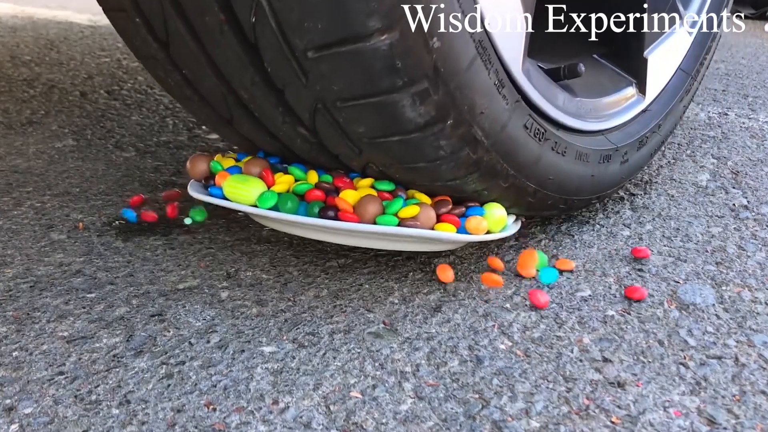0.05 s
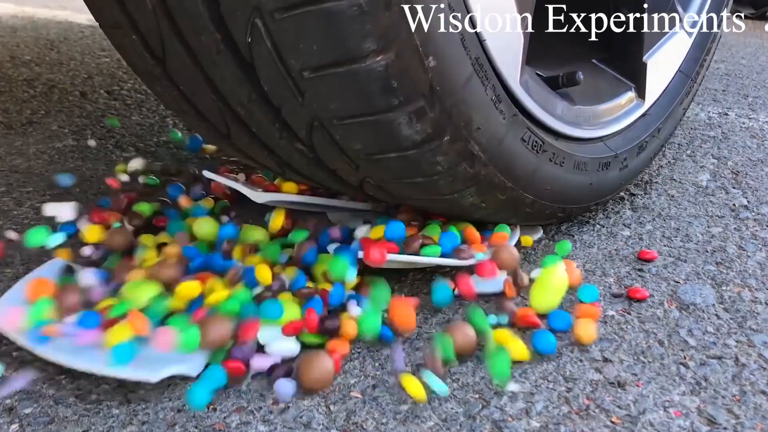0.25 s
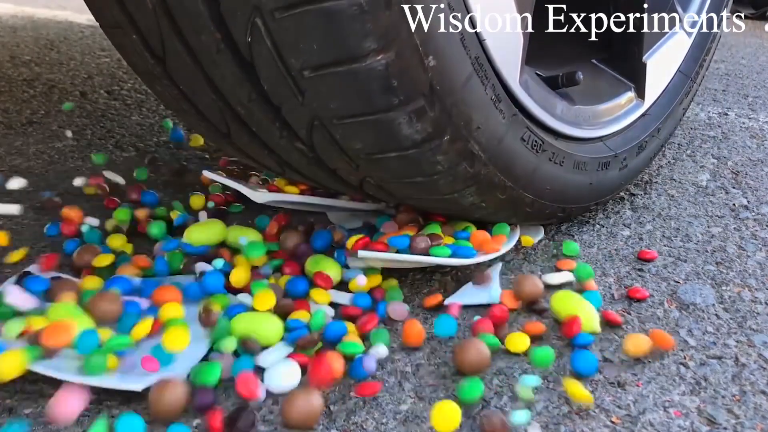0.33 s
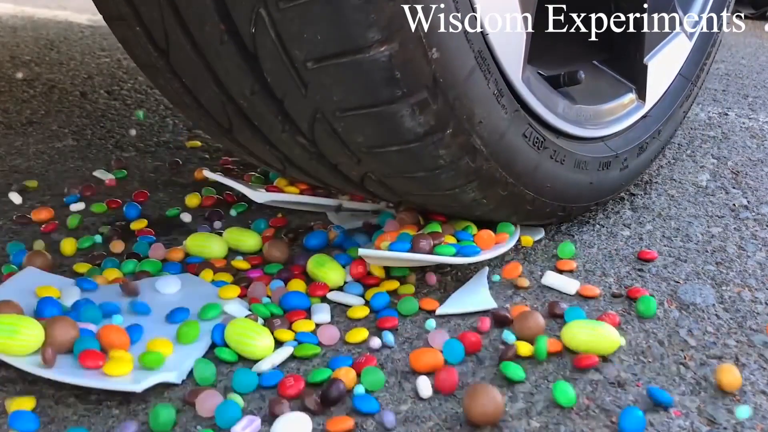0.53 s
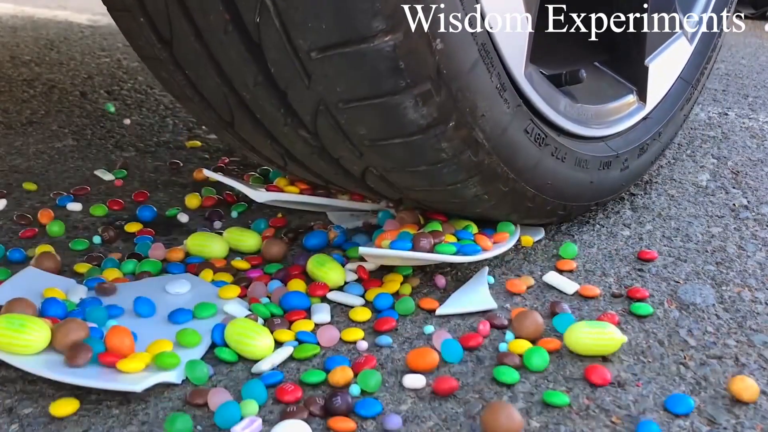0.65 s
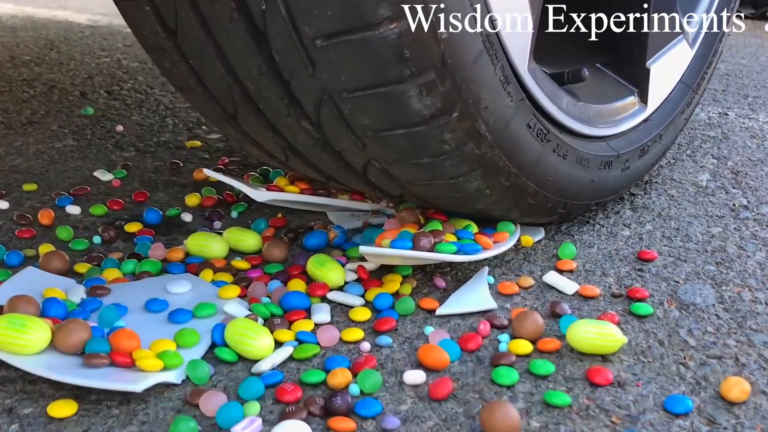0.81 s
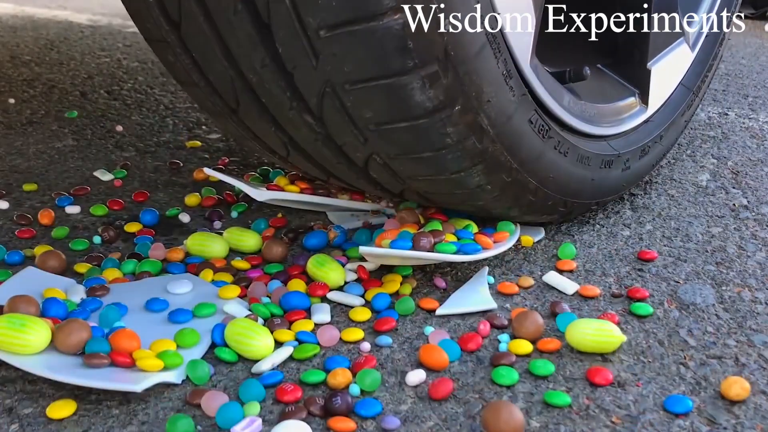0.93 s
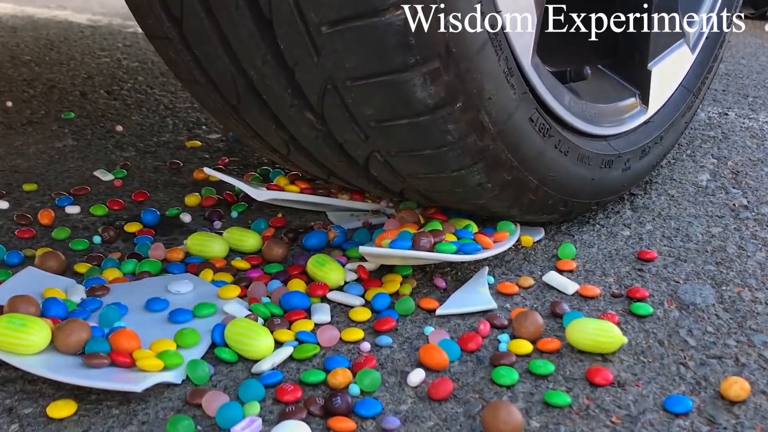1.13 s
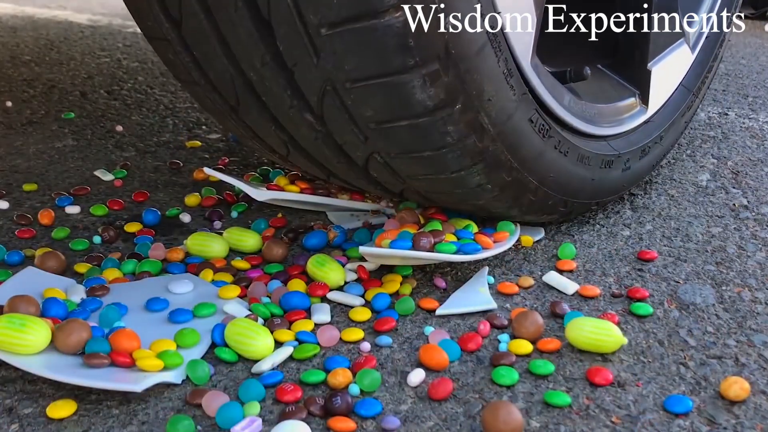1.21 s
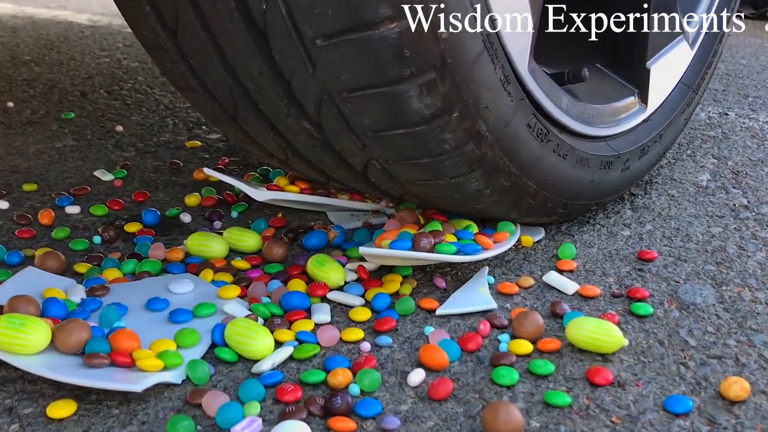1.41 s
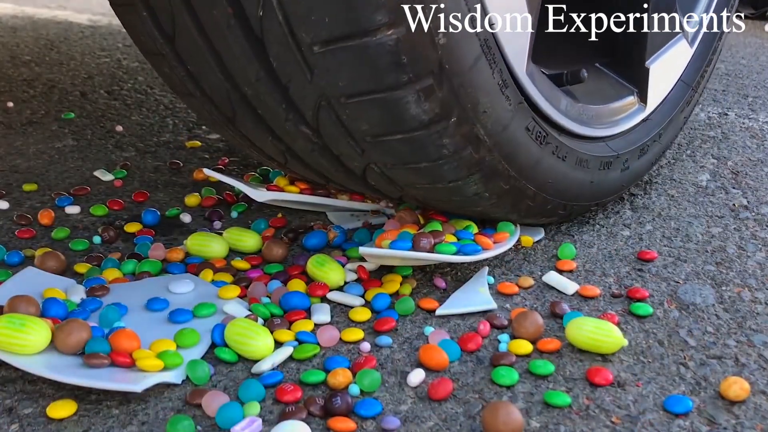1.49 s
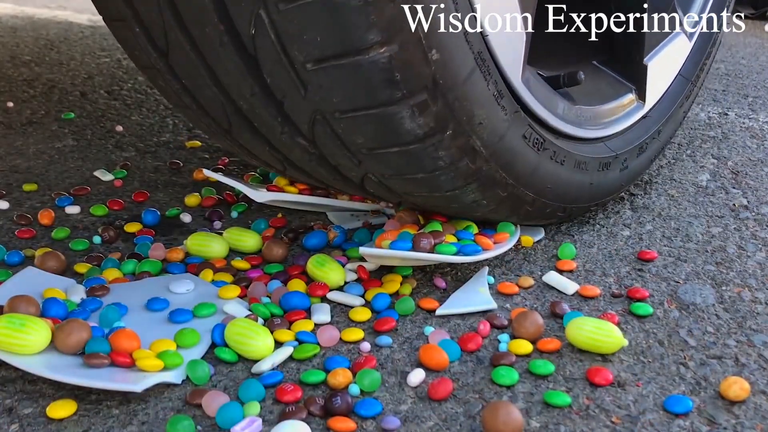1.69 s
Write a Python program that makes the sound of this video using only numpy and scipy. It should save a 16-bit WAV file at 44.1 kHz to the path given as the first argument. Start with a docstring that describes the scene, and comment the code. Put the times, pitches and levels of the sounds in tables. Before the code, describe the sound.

A plate cracks loudly beneath a tyre, then fragments and sweets clatter across asphalt.

```python
"""Sugar shells crackle as a car tyre rolls onto a china plate of sweets on asphalt. The plate snaps in a
brittle fracture, and a large shard skids away, its bending modes struck anew at every contact, while sweets
and fragments scatter and click. The tyre crunches on over the crumbs. Turbulent wind buffets the close
microphone throughout, and the break overloads it."""
import sys
import numpy as np
from scipy import signal
from scipy.fft import rfft, irfft, next_fast_len
from scipy.io import wavfile
from scipy.ndimage import map_coordinates

SR = 44100
rng = np.random.default_rng(int(sys.argv[2]) if len(sys.argv) > 2 else 0)


def digitize_waveform(pressure):
    """Quantize a signal to 16-bit integers and store it at the path in sys.argv[1].

    Rows of a 2-D input are taken as channels; values are limited to [-1, 1].
    """
    field = np.atleast_2d(pressure).T
    bounded = np.clip(field, -1, 1)
    quanta = np.round(bounded * 32767).astype(np.int16)
    wavfile.write(sys.argv[1], SR, quanta)


N = 77175
TIME_S = np.arange(N) / SR


def amp(db):
    """Decibels to amplitude ratio."""
    return 10 ** (np.asarray(db) / 20)


def unit(x):
    """Normalisation to rms 1."""
    return x / np.sqrt(np.mean(x ** 2) + 1e-20)


def curve(rows):
    """Linear interpolation of (time_s, value) points, one value per sample."""
    return np.interp(TIME_S, *np.transpose(rows))


def filtered(x, response):
    """Zero-phase filtering: the spectrum of x times a function of frequency."""
    size = next_fast_len(N + 8192)
    return irfft(rfft(x, size) * response(np.fft.rfftfreq(size, 1 / SR)), size)[:N]


def noise(colour):
    """Gaussian noise of rms 1, spectrally shaped by (frequency_hz, level_db) points."""
    points_hz, db = np.transpose(colour)
    white = rng.standard_normal(N)
    return unit(filtered(white, lambda hz: amp(np.interp(np.log(hz + 1), np.log(points_hz), db))))


def decay(t60_s):
    """Exponential decay by 60 dB in t60_s."""
    return np.exp(-np.log(1000) * TIME_S / t60_s)


def sine(hz):
    """Simple harmonic motion with random phase."""
    return np.sin(2 * np.pi * (hz * TIME_S + rng.random()))


def wobble(knots_per_s):
    """Smooth random modulation: a spline through Gaussian knots."""
    knots = rng.standard_normal(int(N * knots_per_s / SR) + 4)
    return map_coordinates(knots, [TIME_S * knots_per_s])


def add(out, start_s, x):
    """Superposition of x on out from start_s on."""
    i = round(start_s * SR)
    out[i:] += x[:N - i]


def bursts(rows, width_oct):
    """Damped transients: band noise whose amplitude halves width_oct either side of its centre."""
    out = np.zeros(N)
    for start_s, db, centre_hz, t60_s in rows:
        white = rng.standard_normal(N)
        band = filtered(white, lambda hz: 1 / (1 + (np.log2((hz + 1) / centre_hz) / width_oct) ** 2))
        add(out, start_s, amp(db) * decay(t60_s) * unit(band))
    return out


def grains(per_s, centre_hz, spread_oct, decay_cycles, scatter_db, samples):
    """Shot noise of rms 1: randomly timed damped sines, each falling to 1/e in decay_cycles."""
    t = np.arange(samples) / SR
    when, pitch, strength = np.hsplit(rng.random((int(per_s * N / SR), 3)), 3)
    hz = centre_hz * 2 ** (spread_oct * (2 * pitch - 1))
    gain = amp(scatter_db * np.minimum(-np.log(strength), 5))
    rings = gain * np.sin(2 * np.pi * hz * t) * np.exp(-t * hz / decay_cycles)
    index = (when * N).astype(int) + np.arange(samples)
    return unit(np.bincount(index.ravel(), rings.ravel(), N)[:N])


def shell_cracks():
    """Brittle fracture: sugar shells under the tyre release their strain in short dry ticks."""
    # start_s, level_db, centre_hz, t60_s
    cracks = [(.0008, -11.5, 5800, 0.011), (.02, -6, 8000, 0.01), (.0275, -26, 8000, 0.013),
              (.0325, -13.5, 9100, 0.0071), (.05, -13.5, 7300, 0.0088), (.072, -15.5, 13200, 0.021),
              (.086, -21, 4030, 0.021), (.114, -13.5, 8450, 0.0068), (.1325, -20.5, 11300, 0.022),
              (.141, -10.5, 11300, 0.0043), (0.1744, -13.5, 3240, 0.011), (0.2015, -8.5, 5100, 0.0054),
              (.205, -11.5, 9100, 0.012), (0.222, -18, 8000, 0.023), (.871, -22, 13000, 0.0051),
              (.9283, -14.5, 12100, 0.0018), (1.113, -18.5, 13000, 0.007), (1.2515, -23.5, 11600, 0.0089),
              (1.293, -25.5, 11200, 0.0075), (1.3815, -16.5, 6400, 0.016), (1.3942, -23, 7950, .014),
              (1.4212, -22.5, 5340, 0.0083)]
    return bursts(cracks, width_oct=1.55)


def sweet_rattle():
    """Heavily damped impacts: rolling and crushed sweets make tiny clicks that merge into a rattle."""
    # time_s, level_db
    levels = [(0, -24.5), (.04, -34.5), (.11, -37.5), (.165, -38), (.23, -29), (.26, -10), (.33, -38),
              (.42, -42), (.48, -32.5), (.62, -38.5), (.74, -37.5), (.9, -43), (1.0, -38), (1.12, -45),
              (1.3, -45.5), (1.5, -59), (1.75, -48)]
    clicks = grains(per_s=2200, centre_hz=8270, spread_oct=1.03, decay_cycles=3.4,
                    scatter_db=3, samples=256)
    return amp(curve(levels)) * clicks


def wind():
    """Turbulent pressure on the microphone rumbles; stronger gusts reach higher in frequency."""
    # gust strength: time_s, level_db
    gusts = [(0, -32.5), (.06, -40.5), (.122, -47), (.136, -25.5), (.165, -42), (.22, -29.5), (.265, -21),
             (.33, -30.5), (.42, -41.5), (.51, -36.5), (.65, -47.5), (.9, -42.5), (.97, -38), (1.07, -42.5),
             (1.13, -38), (1.15, -25.5), (1.21, -23), (1.26, -26), (1.32, -28), (1.38, -37), (1.44, -34),
             (1.485, -27.5), (1.53, -24.5), (1.555, -31), (1.571, -22.5), (1.59, -35.5), (1.66, -28),
             (1.75, -28)]
    # spectrum of the rumble: frequency_hz, level_db
    low_colour = [(20, -15), (65, 1), (170, -2), (300, -8), (700, -28), (2000, -63), (8000, -90)]
    # spectrum that strong gusts bring out: frequency_hz, level_db
    high_colour = [(40, -62), (170, 4.5), (400, -4.5), (650, -5), (1100, -22.5), (3000, -26), (10000, -82)]
    gust_db, strong_db = curve(gusts), -22
    high_db = -27.5 + 1.76 * (gust_db - strong_db)
    return amp(gust_db - 1) * noise(low_colour) + amp(high_db) * noise(high_colour)


def outdoor_hiss():
    """Broadband ambient noise, whose level dips after the break and recovers."""
    # frequency_hz, level_db
    colour = [(180, -28), (300, -6.5), (500, 1), (744, -2.5), (1280, -3.5), (1440, -4.5), (2280, -4.5),
              (10800, -19.5), (11900, -10.5), (15500, -13)]
    # time_s, level_db
    levels = [(0, -35.5), (.24, -37), (.45, -70), (.7, -52), (.9, -44), (1.15, -39.5), (1.4, -38),
              (1.75, -38)]
    return amp(curve(levels)) * noise(colour)


def plate_knocks():
    """Damped resonance: the strained plate knocks on the asphalt in a narrow band."""
    # start_s, level_db, centre_hz, t60_s
    knocks = [(.086, -22, 840, 0.025), (.1744, -19, 900, 0.021), (.2012, -24, 950, 0.036),
              (.2445, -4, 943, .022), (.247, -10.5, 440, 0.017)]
    return bursts(knocks, width_oct=0.32)


def wind_puffs():
    """Bipolar pressure pulses: each sharp buffet pushes and then pulls the diaphragm."""
    # centre_s, peak_db, half_width_s
    puffs = [(.134, -21.5, 0.00063), (1.174, -15.5, .0005), (1.242, -14.5, 0.00072), (1.257, -15, 0.0011),
             (1.486, -17, 0.00062), (1.57, -15, 0.00048)]
    out = np.zeros(N)
    for centre_s, peak_db, half_width_s in puffs:
        u = (TIME_S - centre_s) / half_width_s
        out -= amp(peak_db) * u * np.exp((1 - u ** 2) / 2)
    return out


def plate_fracture():
    """Sudden release of strain: the plate snaps in broad bursts and its freed halves flex in low modes."""
    # start_s, level_db, t60_s
    snaps = [(0.2442, 2, 0.041), (0.2474, -11.5, 0.22)]
    # spectrum of a snap: frequency_hz, level_db
    colour = [(40, 7), (200, 14.5), (500, -1), (1000, 5), (1400, 3), (2700, 0), (5000, 0.5), (6500, -11.5),
              (10000, -5), (16000, -16)]
    # pitch_hz, level_db, t60_s
    bending_modes = [(211.7, -6.5, 0.42), (602, -27.5, 0.44)]
    bend_start_s, attack_s = 0.255, 0.017
    attack = 1 - np.exp(-TIME_S / attack_s)
    out = np.zeros(N)
    for start_s, db, t60_s in snaps:
        add(out, start_s, amp(db) * decay(t60_s) * noise(colour))
    for hz, db, t60_s in bending_modes:
        add(out, bend_start_s, amp(db) * decay(t60_s) * attack * sine(hz))
    return out


def china_fragments():
    """Lighter damping lets tumbling bits of china ring longer than the sweets."""
    # time_s, level_db
    levels = [(.24, -54), (.25, -23), (.285, -13), (.31, -27.5), (.37, -19.5), (.42, -27.5), (.455, -36),
              (.55, -40), (.66, -42.5), (.74, -62)]
    rings = grains(per_s=1100, centre_hz=4895, spread_oct=1.3, decay_cycles=24,
                   scatter_db=2, samples=1024)
    return amp(curve(levels)) * rings


def clinks():
    """Free vibration: loose sweets and chips land and ring briefly in inharmonic modes."""
    # start_s, level_db, pitch_hz, t60_s
    landings = [(0.25, 0, 14300, .04), (.3225, -1, 4930, 0.058), (.344, -8, 4210, 0.14),
                (0.3624, -12.5, 2510, 0.03), (.364, -12.5, 6110, 0.081), (0.499, -23, 6960, 0.34),
                (0.8384, -29.5, 2370, 0.032), (0.8402, -25.5, 5610, 0.028), (0.9379, -10.5, 6560, 0.011),
                (0.9657, -16, 6280, 0.011), (0.99, -23.5, 6700, 0.022), (1.003, -26, 6670, .025),
                (1.0196, -23, 5650, 0.03), (1.3819, -12, 6110, 0.0068), (1.395, -21.5, 6070, 0.011),
                (1.4212, -24, 6360, 0.0098)]
    # frequency_ratio, level_db
    chip_modes = [(1, -1.5), (0.87, -10), (0.34, -21.5), (1.3, -20), (1.3, -20)]
    out = np.zeros(N)
    for start_s, db, hz, t60_s in landings:
        ring = sum(amp(mode_db) * sine(hz * ratio) for ratio, mode_db in chip_modes)
        add(out, start_s, amp(db) * decay(t60_s) * ring)
    return out


def rocking(pace):
    """Beating: a mode and its close twin interfere and flutter as the shard rocks; a complex gain."""
    beat_hz, wander_hz, knots_per_s = 30 * pace, 17 * pace, 60
    flutter_db, twin_db = 2.5, -4

    def partial(offset_hz):
        """Random amplitude and frequency modulation about offset_hz."""
        flutter = amp(flutter_db * wobble(knots_per_s * pace))
        hz = offset_hz + wander_hz * wobble(knots_per_s)
        return flutter * np.exp(2j * np.pi * np.cumsum(hz) / SR)

    pair = partial(0) + amp(twin_db) * partial(beat_hz) * np.exp(2j * np.pi * rng.random())
    return pair / np.sqrt(np.mean(np.abs(pair) ** 2))


def shard():
    """Modal ringing: contacts scrape and strike the shard; its pitch rises as it sheds its mass of sweets."""
    # pitch_hz, flat_db, edge_db, t60_s, rise_hz; both levels are weighted by a contact's edge_share
    modes = [(1702, 0, -17.5, 0.13, 12), (1766, 0, -13, 0.31, 35.5), (2562, 0, -26.5, .14, 18.5),
             (3495, 2.5, -14.5, 0.11, 50), (4194, 0, 3, 0.19, 27.5), (4890, -14, -26, 0.067, 53),
             (4918, 3.5, -7.5, 0.063, 84.5), (5147, 1.5, -0.5, 0.096, 61), (6080, -7, -5, 0.19, 4),
             (7090, -14, -1, 0.14, 1), (7100, -6.5, -0.5, 0.094, 20.5), (7840, -6, -8, 0.19, 24),
             (8090, -1, -9.5, 0.055, 37), (9050, -15, -10, 0.49, 16.5), (9480, -11, -6, 0.13, 7),
             (10840, -11.5, -4, 0.28, 15), (11780, -9.5, -2, 0.24, 21), (13160, -4, -2, 0.15, 63),
             (14100, -14, 4, 0.11, 1.5), (14400, -7, 4, 0.18, 7), (14550, -9, -5, 0.13, 14)]
    # start_s, ring_db, edge_share (0 lands flat, 1 skips on the edge), scrape_db
    contacts = [(0.251, -11, 1, -16), (0.2576, -8.5, 0.44, 0), (0.268, -12.5, 0, -16),
                (0.2744, -10.5, 0.01, -10), (0.281, -12, 0.12, -19), (0.291, -11, 0, -8),
                (0.3239, -11.5, 0.12, -8.5), (0.346, -19, 0.03, -24), (0.3624, -15.5, 0.29, -11),
                (.385, -17, 0.54, -19), (0.399, -20, 0.8, -31), (0.416, -16.5, 0.21, -20),
                (0.456, -26, 1, -38), (0.467, -20.5, 0.8, -22), (0.479, -21, 0.61, -34),
                (.499, -30, 0.8, -36), (0.516, -20, 0.75, -32), (0.532, -23, 0.44, -36),
                (0.549, -29, 0.5, -45), (0.561, -21, 0.8, -47), (0.579, -27, 1, -44),
                (0.603, -25, 0.61, -47), (.625, -26, 1, -50), (0.654, -29, 1, -54), (0.673, -28, 1, -54),
                (.692, -32, 0.7, -36), (.765, -39, 1, -55)]
    # frequency_hz, level_db
    scrape_colour = [(200, -20), (900, -27), (1600, 8), (2400, 8.5), (5000, -9), (6500, -1.5),
                     (10000, -4.5), (16000, -1)]
    flat_rise_s, edge_rise_s, scrape_t60_s = 0.0013, 0.0037, 0.019
    spill_start_s, spill_end_s = 0.304, 0.56
    soft_db, reference_hz = -25.5, 4200
    start_s, ring_db, edge, scrape_db = np.transpose(contacts)
    onsets = np.round(start_s * SR).astype(int)
    lengths = (SR * (flat_rise_s * (1 - edge) + edge_rise_s * edge)).astype(int)
    spilled = curve([(spill_start_s, 0), (spill_end_s, 1)])
    dulling_db_per_oct = 0.64 * np.maximum(soft_db - ring_db, 0)  # soft contacts ring duller
    scatter_db = 2.5 * rng.standard_normal((len(contacts), len(modes)))
    phases = np.exp(2j * np.pi * rng.random(scatter_db.shape))
    ring, impulses = np.zeros(N), np.zeros(N)
    for k, (hz, flat_db, edge_db, t60_s, rise_hz) in enumerate(modes):
        dull_db = dulling_db_per_oct * max(np.log2(hz / reference_hz), 0)
        coupling_db = flat_db * (1.5 - edge) + edge_db * edge
        kicks = amp(ring_db - dull_db + coupling_db + scatter_db[:, k]) * phases[:, k]
        force = np.zeros(N, complex)
        for onset, length, kick in zip(onsets, lengths, kicks):
            force[onset:onset + length] += kick / length  # the ring builds while the contact lasts
        envelope = signal.lfilter([1], [1, -decay(t60_s)[1]], force)
        envelope *= rocking(pace=(hz / reference_hz) ** 0.6)  # high modes flutter faster
        carrier = np.exp(2j * np.pi * np.cumsum(hz + rise_hz * spilled) / SR)
        ring += np.real(envelope * carrier)
    impulses[onsets] = amp(scrape_db)
    scrape_envelope = signal.lfilter([1], [1, -decay(scrape_t60_s)[1]], impulses)
    return ring + scrape_envelope * noise(scrape_colour)


def reflections(direct, level_db, t60_s):
    """Diffuse reflection from the car's body and the ground: convolution with a short noise tail."""
    tail = rng.standard_normal(N) * decay(t60_s)
    return amp(level_db) * signal.fftconvolve(direct, tail / np.linalg.norm(tail))[:N]


def scene():
    """Superposition of the close sources, their reflections and the wind, in one channel."""
    direct = plate_fracture() + shard() + shell_cracks() + plate_knocks()
    direct += clinks() + sweet_rattle() + china_fragments()
    echo = reflections(direct, level_db=-9, t60_s=0.099)
    return (direct + echo + wind() + outdoor_hiss() + wind_puffs())[None]


def record(dry):
    """Saturation and band limiting: the microphone soft-clips the break and cuts the highest treble."""
    ceiling, hardness, top_hz = 0.95, 5, 16000
    clipped = dry[0] / (1 + np.abs(dry[0] / ceiling) ** hardness) ** (1 / hardness)
    return filtered(clipped, lambda hz: hz < top_hz)[None]


dry = scene()
out = record(dry)
digitize_waveform(out)
```